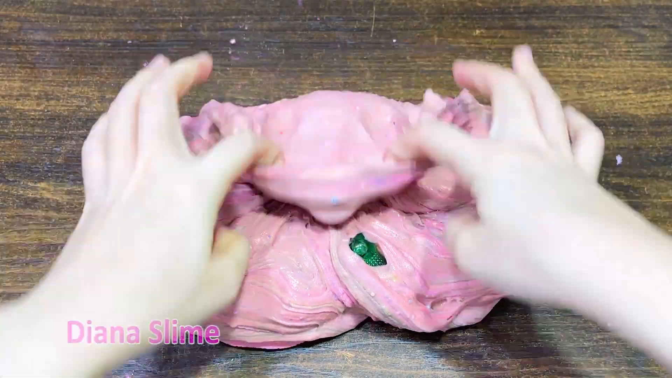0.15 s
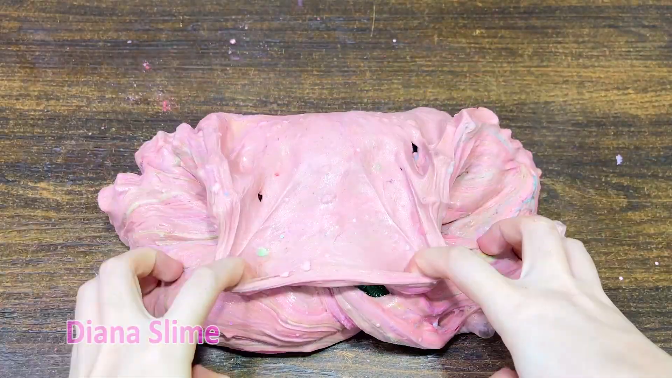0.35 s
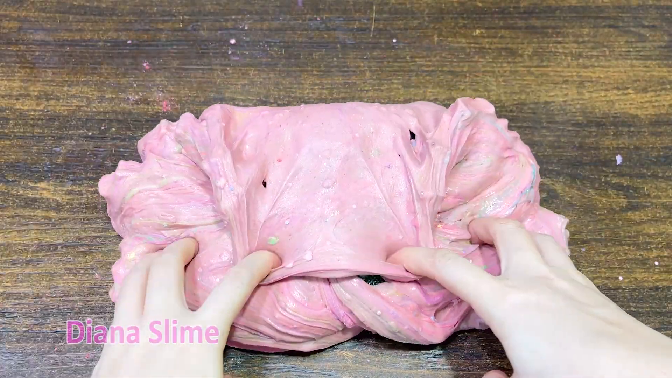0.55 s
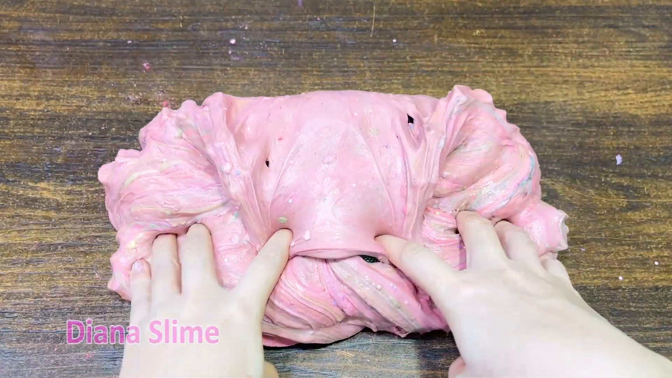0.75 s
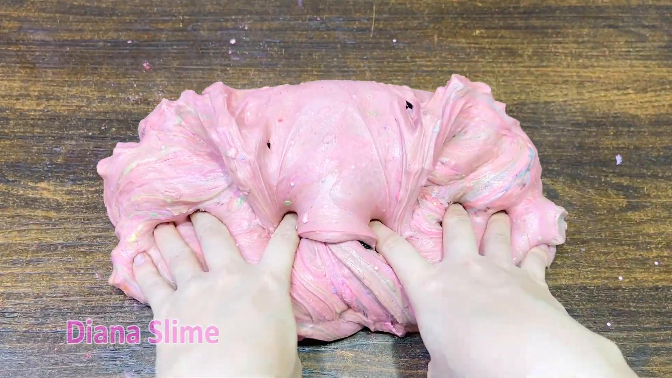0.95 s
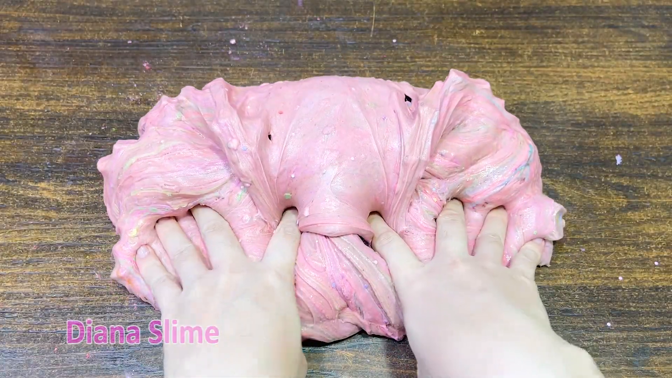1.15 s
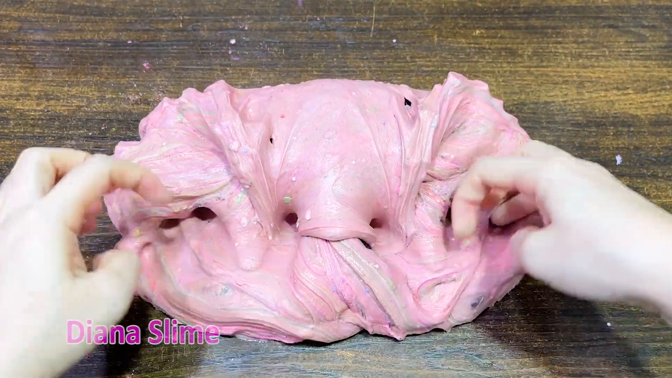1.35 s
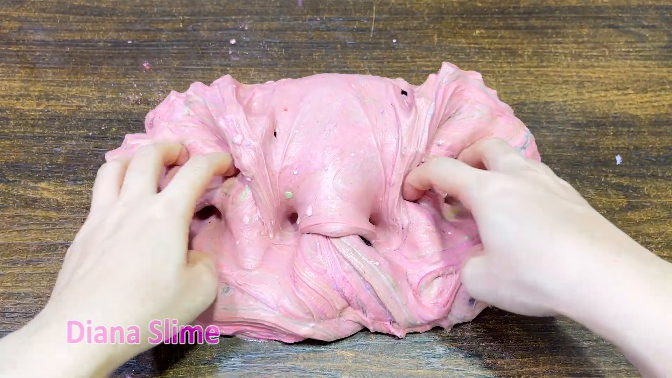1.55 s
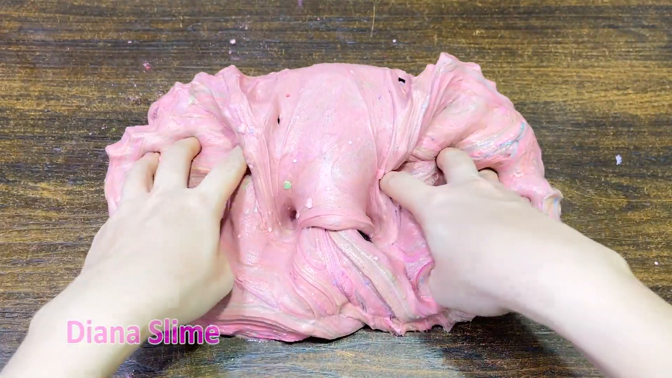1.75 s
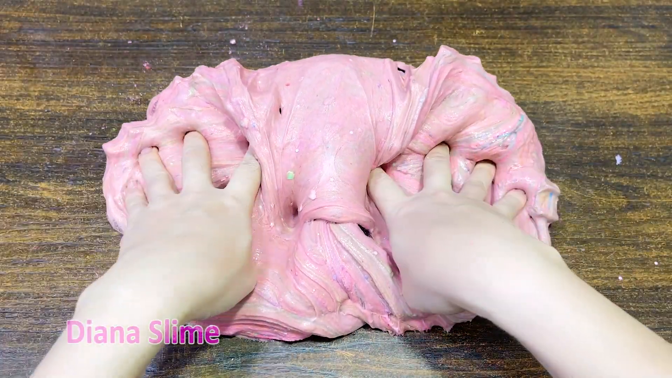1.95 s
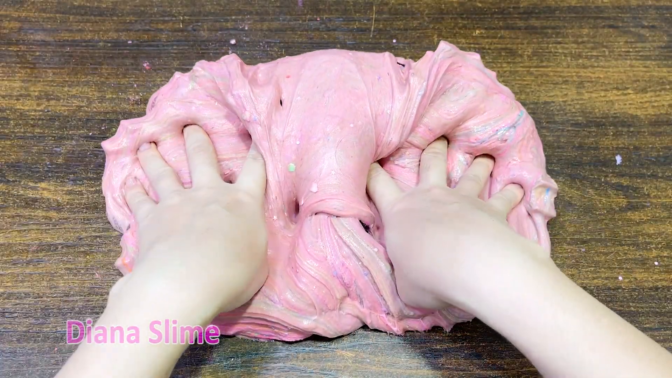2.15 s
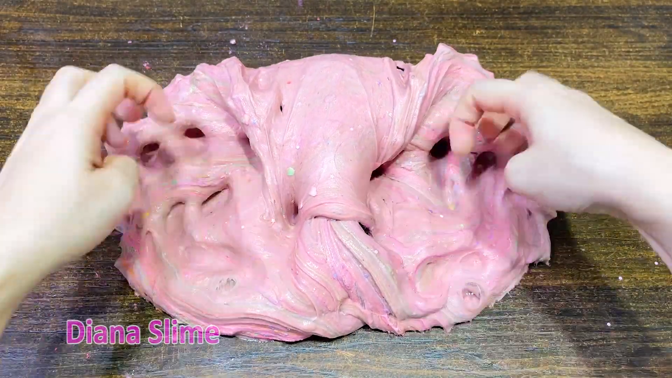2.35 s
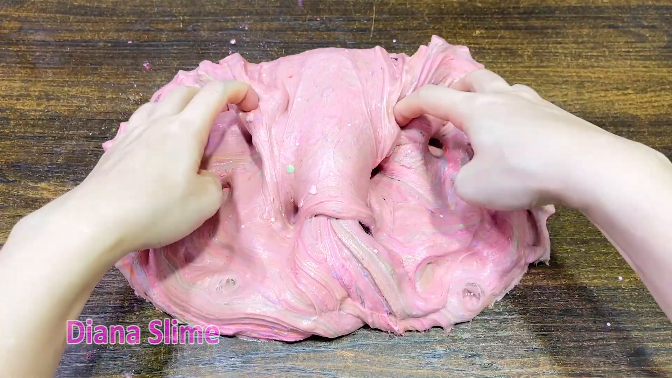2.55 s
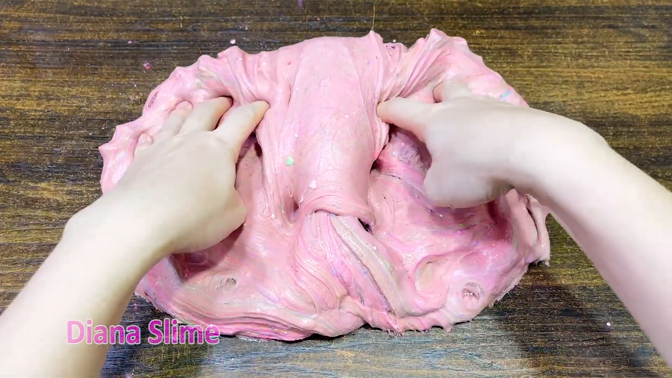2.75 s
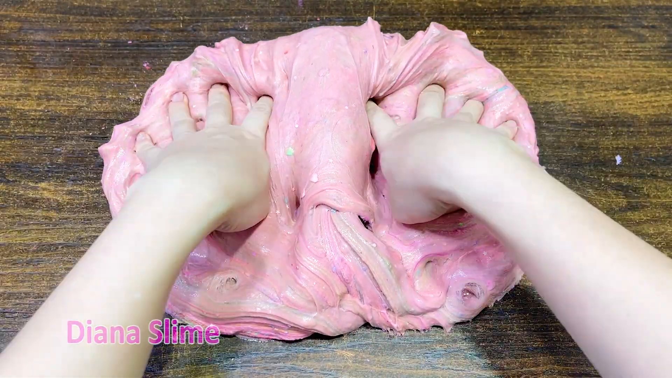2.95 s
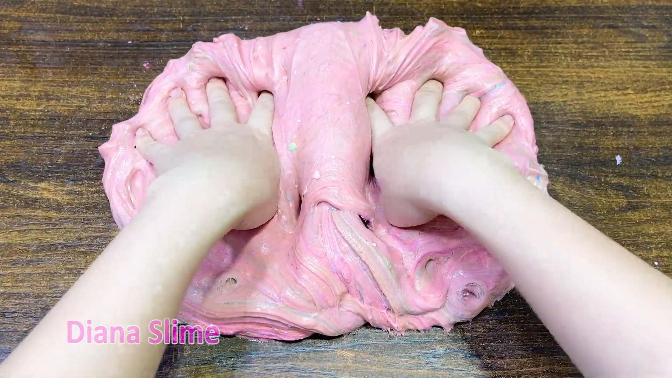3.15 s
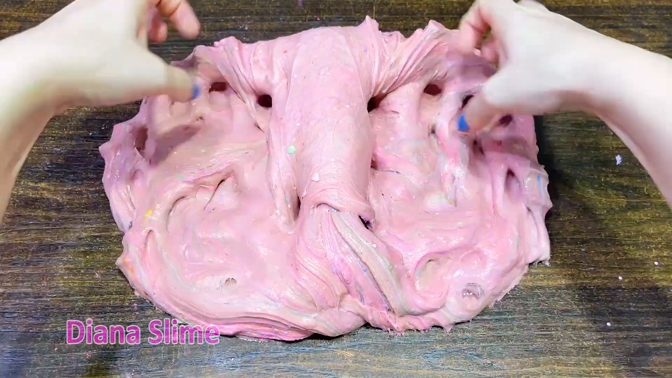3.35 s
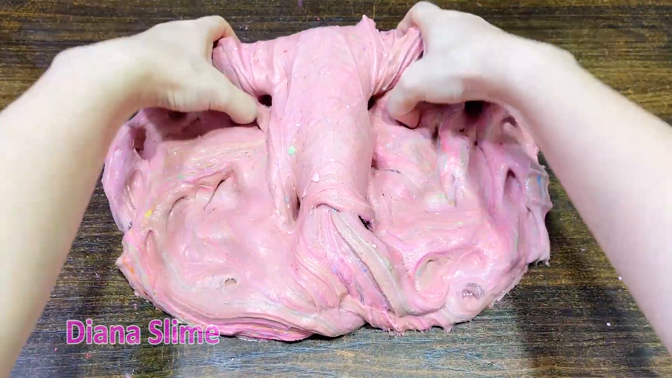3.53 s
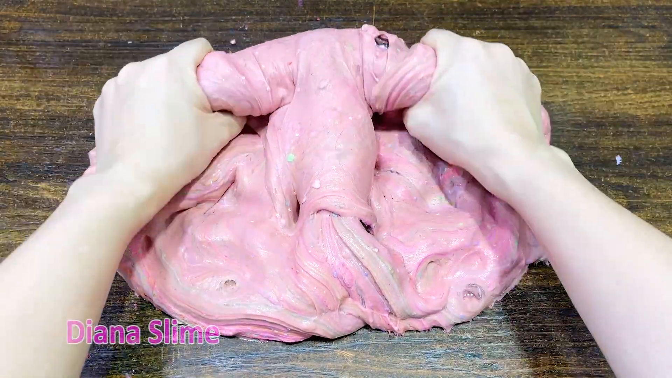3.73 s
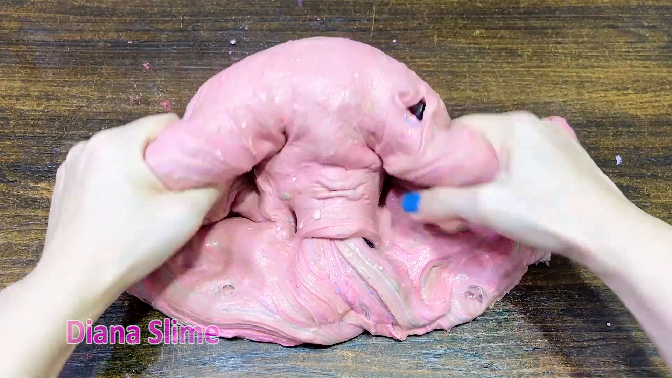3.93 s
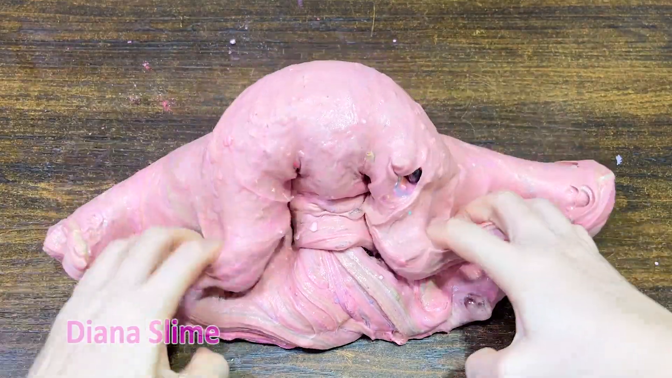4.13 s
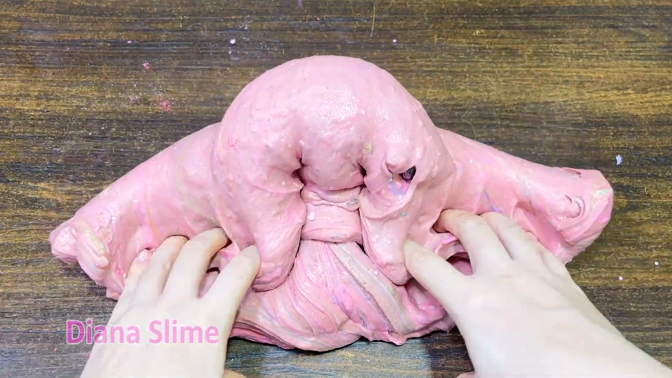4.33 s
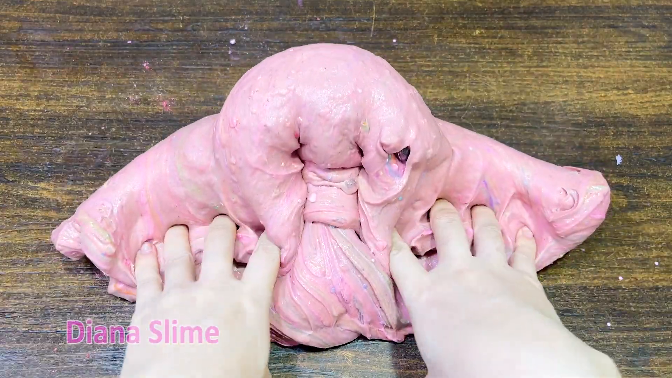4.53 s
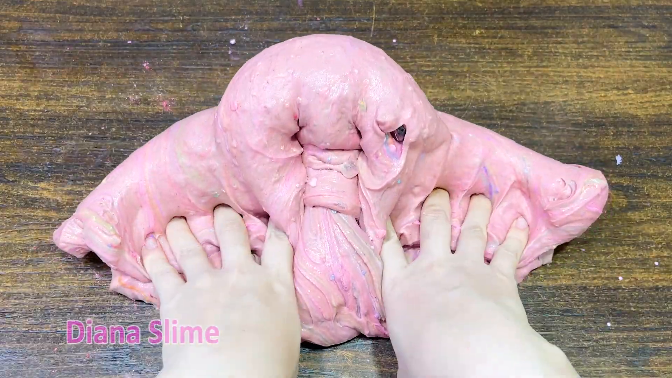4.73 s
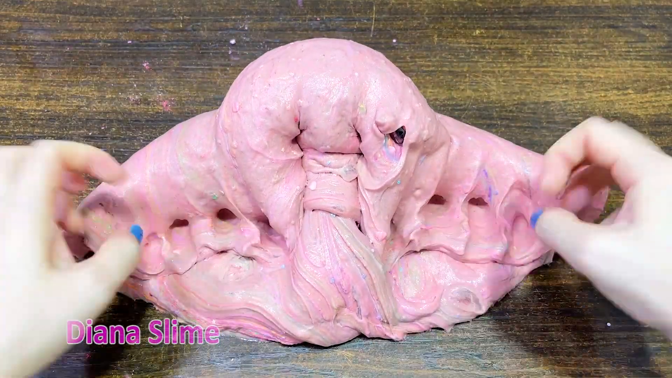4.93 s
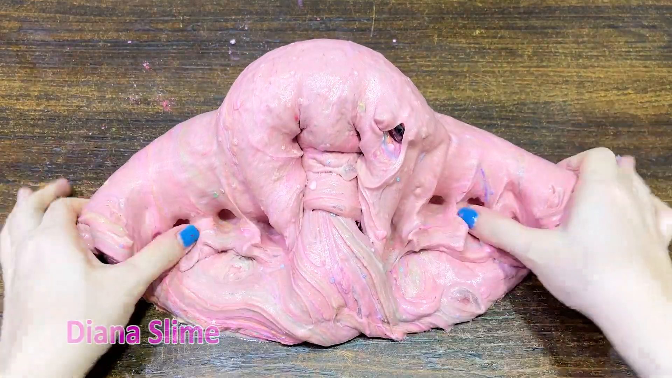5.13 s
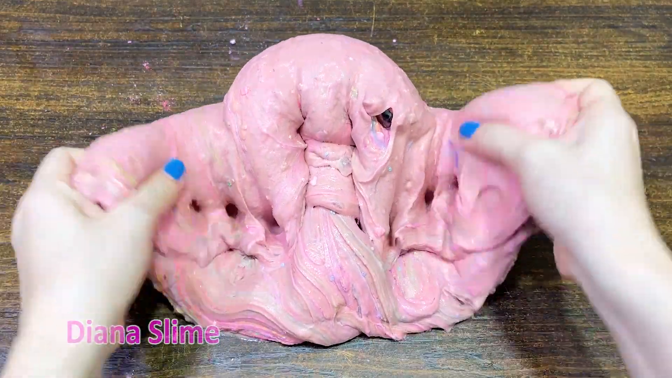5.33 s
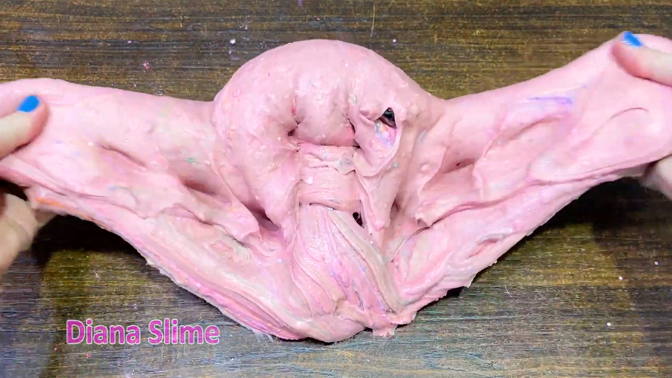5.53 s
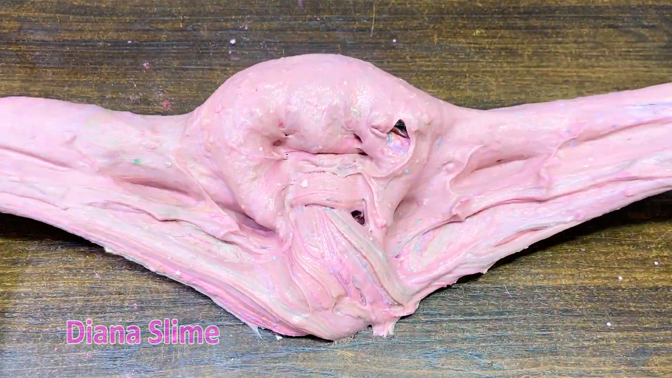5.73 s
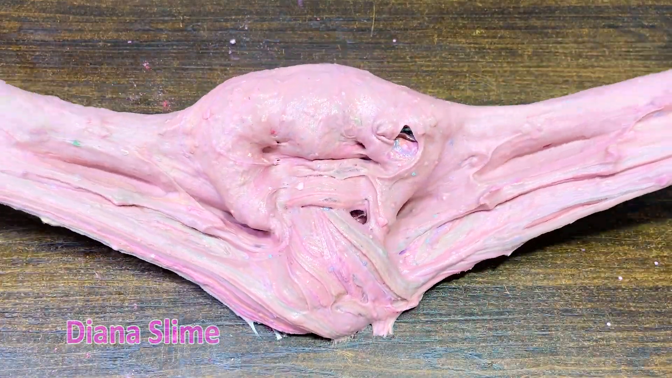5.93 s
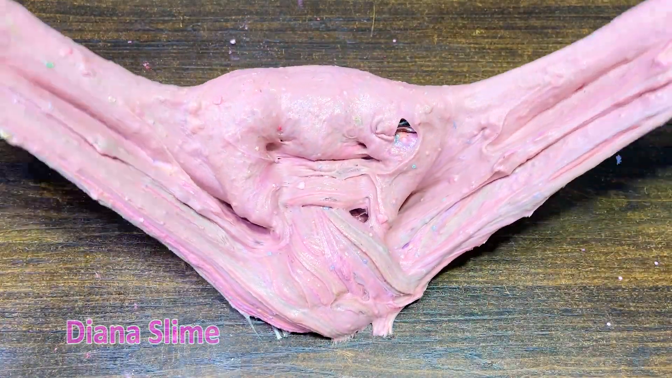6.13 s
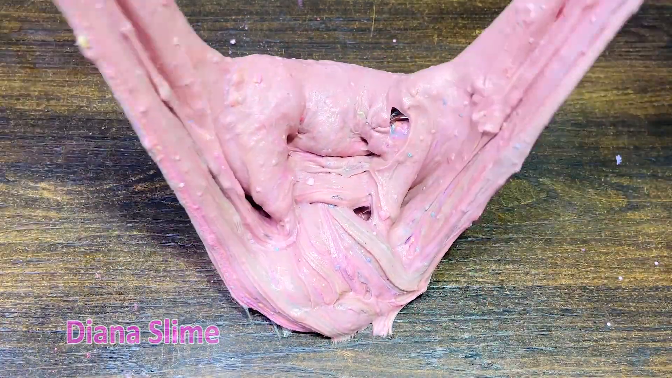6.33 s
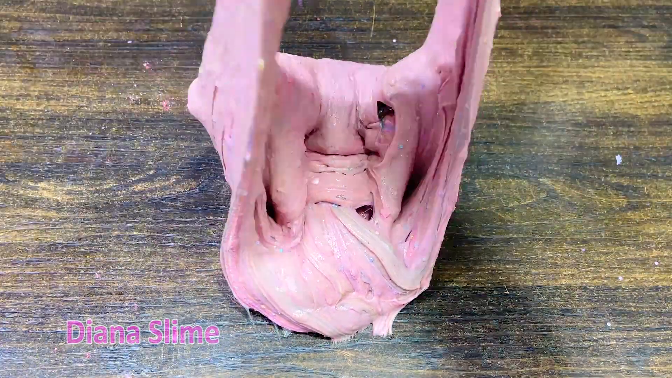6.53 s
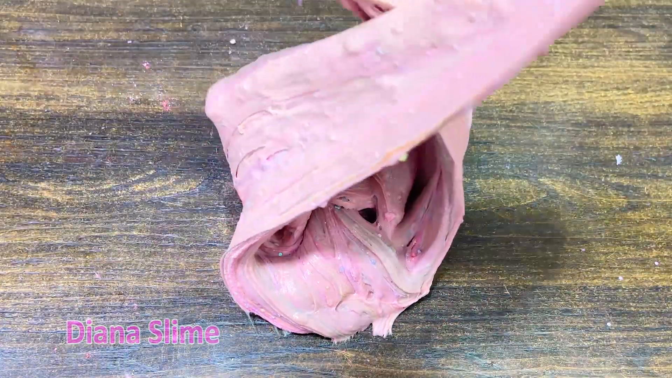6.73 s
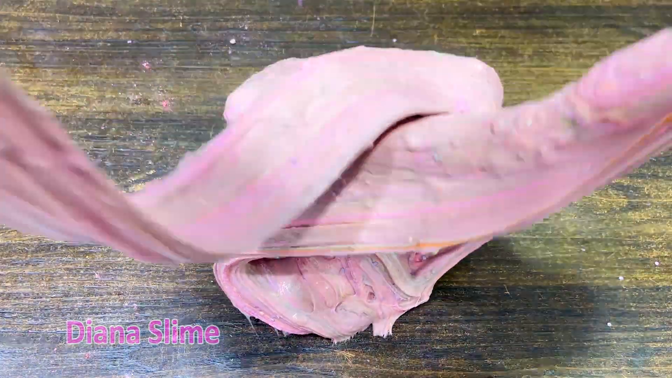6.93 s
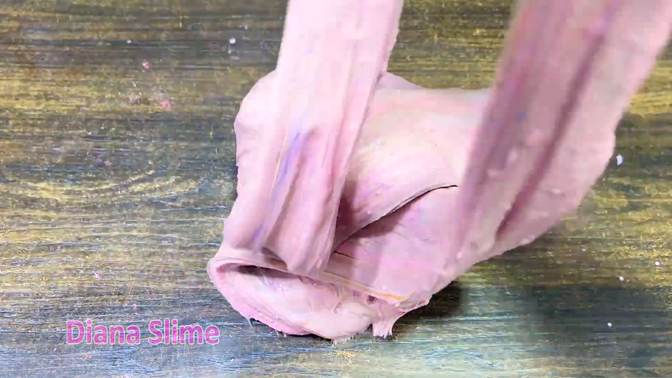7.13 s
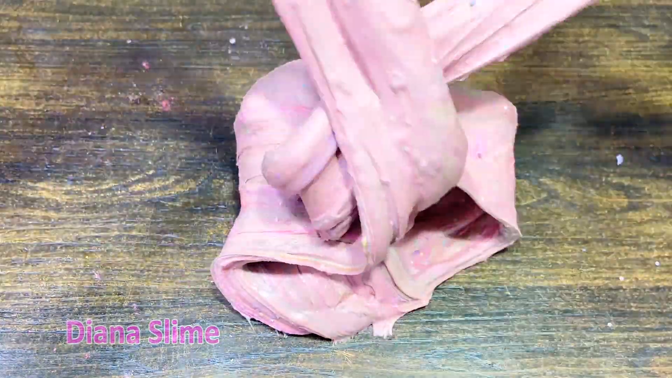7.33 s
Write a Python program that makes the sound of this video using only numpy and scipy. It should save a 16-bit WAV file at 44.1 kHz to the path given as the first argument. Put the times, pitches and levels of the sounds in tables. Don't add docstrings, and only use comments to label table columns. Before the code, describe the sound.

Very close stereo sound of hands working a soft, airy, sticky mass on a wooden table. A crackling spread comes first, then scattered pops and three short, increasingly strong wet tearing bursts with hollow plops. Folding crackles softly, another pull snaps hard, stretching pops and fizzes, then it quiets. The small room is still, with a faint distant machine drone.

```python
import sys
import numpy as np
from scipy import signal
from scipy.fft import rfft, irfft
from scipy.io import wavfile

SR = 44100
rng = np.random.default_rng(int(sys.argv[2]) if len(sys.argv) > 2 else 0)


def field_ratio(decibels):
    return 10 ** (np.asarray(decibels, dtype=float) / 20)


def int16_out(signal):
    q = np.round(np.clip(np.atleast_2d(signal).T, -1, 1) * 32767)
    wavfile.write(sys.argv[1], SR, q.astype(np.int16))


N = 329868
FIZZ_TOP_HZ = 15800


def rms_one(x):
    return x / np.sqrt(np.mean(x ** 2) + 1e-20)


def peak_one(x):
    return x / np.abs(x).max()


def in_time(rows):
    s, *columns = np.transpose(rows)
    return [np.interp(np.arange(N) / SR, s, c) for c in columns]


def at_hz(points, hz):
    points = np.array(points)
    return np.interp(np.log(hz + 1e-9), np.log(points[:, 0]), points[:, 1])


def drift(rate):
    r = np.exp(-80 * np.pi * rate / SR)
    noise = rng.standard_normal(N // 40 + 2002)
    slow = signal.lfilter([1], [1, -2 * r, r * r], noise)[2000:]
    return np.interp(np.arange(N) / 40, np.arange(len(slow)), rms_one(slow))


def resonance(x, hz, width_hz):
    r = np.exp(-np.pi * width_hz / SR)
    zeros = np.array([1, 0, -1]) * (1 - r * r) / 2
    return signal.lfilter(zeros, [1, -2 * r * np.cos(2 * np.pi * hz / SR), r * r], x)


def add(out, s, sound):
    i = max(round(s * SR), 0)
    out[i:i + len(sound)] += sound[:N - i]


def coherent(mid, side, alike):
    return np.sqrt(1 + alike) * mid + np.sqrt(1 - alike) * side * [[1], [-1]]


def stroke(start, end, peak_db, build_db, rise, fall):
    t = np.arange(N) / SR
    held = peak_db - build_db * np.clip((end - t) / (end - start + 1e-6), 0, 1)
    before, after = np.maximum(start - t, 0), np.maximum(t - end, 0)
    return field_ratio(2 * (held - rise * before - fall * after))


# seal breaks t/s, fingers free t/s, crackle level/dB,
# fizz level/dB, squelch level/dB
PULLS = [
    (1.356, 1.456, -29, -24, -37.5),
    (2.371, 2.432, -25.5, -22, -34),
    (3.349, 3.4, -22.5, -21, -28.5),
    (4.957, 5.02, -23.5, -24.5, -34),
]
# start t/s, end t/s, crackle level/dB, fizz level/dB
PRESSES = [(0, 0.063, -60, -49.5), (0.312, 0.378, -55.5, -49), (0.593, 0.776, -76, -63),
           (1.072, 1.099, -66, -61), (1.594, 1.793, -67, -73.5), (1.94, 2.15, -68, -68),
           (2.637, 3.058, -71, -65), (4.3, 4.412, -62, -58.5), (4.6, 4.753, -75, -69.5),
           (7.386, 7.461, -70, -73.5)]
# t/s, effort as crackle level/dB, thinness as extra fizz level/dB, pocket f/Hz
SPREAD = [(.06, -54, 7, 3176), (.115, -32.5, -1, 3260), (.14, -30.5, 4, 1516), (.21, -40.5, 7, 1500),
          (.27, -62.5, 8.5, 3000)]
FOLD = [(3.601, -90.5, 19.5, 2400), (3.635, -55, -11.5, 2265), (3.66, -45.5, -7, 2060),
        (3.8, -50, 2.5, 1788), (3.85, -45, 5.5, 1733), (4.03, -45.5, 4.5, 1680), (4.1, -43.5, 11, 1614),
        (4.159, -44, 4, 1690), (4.251, -57.5, 8.5, 1690)]
GRAB = [(5.172, -72.5, -6.5, 1995), (5.26, -54.5, 0.5, 1924), (5.312, -45, 4.5, 1965),
        (5.421, -43, 2.5, 2189), (5.503, -39, 7, 2475), (5.55, -44.5, 9, 2563), (5.621, -57.5, 4.5, 2920)]
STRETCH = [(5.631, -58, 3, 3330), (5.85, -56, 6, 3530), (6.15, -60.5, 4.5, 4005), (6.35, -61.5, 11.5, 4210),
           (6.44, -67.5, 11, 3040), (6.501, -54.5, 10.5, 2184), (6.55, -61, 7, 2304),
           (6.6, -79, 13.5, 2514)]


def handling():
    break_rise = 606.5
    wet_fall, fizz_fall, squelch_fall = 479.5, 519, 499
    wet = fine = squelch = field_ratio(2 * -90.5)
    for start, free, wet_db, fine_db, squelch_db in PULLS:
        wet = wet + stroke(start, free, wet_db, 17.5, break_rise, wet_fall)
        fine = fine + stroke(start, free - .015, fine_db, 13, break_rise, fizz_fall)
        fine = fine + stroke(free, free + 0.028, fine_db - 18, 0, break_rise, 254)
        squelch = squelch + stroke(start + 0.031, free + 0.0046, squelch_db, 4.5, break_rise, squelch_fall)
    for start, end, wet_db, fine_db in PRESSES:
        shape = stroke(start, end, 0, 0, rise=130, fall=112)
        wet = wet + field_ratio(2 * wet_db) * shape
        fine = fine + field_ratio(2 * fine_db) * shape
    for gesture in SPREAD, FOLD, GRAB, STRETCH:
        effort_db, thin_db, _ = in_time(gesture)
        power = field_ratio(2 * effort_db) * stroke(gesture[0][0], gesture[-1][0], 0, 0, break_rise, break_rise)
        wet = wet + power
        fine = fine + power * field_ratio(2 * thin_db)
        squelch = squelch + power * field_ratio(2 * -15)
    return 10 * np.log10([wet, fine, squelch])


def pockets():
    sealed_hz, open_hz, rest_hz, opening_s, closing_s = 3700, 1900, 3200, .04, .06
    rows = [(s, hz) for s, _, _, hz in SPREAD + FOLD + GRAB + STRETCH]
    rows += [(N / SR, 2710.0)]
    for _, free, *_ in PULLS:
        rows += [(free - opening_s, sealed_hz), (free, open_hz), (free + closing_s, rest_hz)]
    return sorted(rows)


def grains(spectrum, per_s, spread_db, sharpness, clump_db, patchy_db, width, count, pocket_db=0):
    sizes = field_ratio(spread_db * np.minimum(rng.exponential(1, N), 5)) * rng.choice([-1, 1], N)
    struck = rng.random(N) < per_s / SR
    clumps = field_ratio(clump_db * (drift(31) + drift(4.3)))
    impulses = sizes * struck / np.sqrt(per_s) * clumps
    impulses = impulses * (1 + width * rng.standard_normal(N) * [[1], [-1]])
    dealt = rng.integers(0, count, N)
    pocket, out = np.log(in_time(pockets())[0]), 0
    for k, hz in enumerate(np.geomspace(spectrum[0][0], spectrum[-1][0], count)):
        favoured_db = pocket_db * np.clip(1 - ((np.log(hz) - pocket) / .32) ** 2, 0, 1)
        gain = field_ratio(at_hz(spectrum, hz) + patchy_db * drift(13) + favoured_db)
        out = out + gain * resonance(impulses * (dealt == k) + 1e-18, hz, hz / sharpness)
    return rms_one(out)


# f/Hz, level/dB per grain; low squelch, wet crackle, fine fizz
SQUELCH = [(420, 8), (600, -6), (850, 10), (1050, -13.5)]
WET = [(1400, -2), (1600, 1), (2200, -5), (3500, -0.5), (5500, -5)]
FINE = [(5500, -6), (7000, -3.5), (9000, -14), (11000, -7.5), (14000, 6.5), (15600, 2.5)]


def tearing(wet_db, fine_db, squelch_db):
    busy = np.clip(field_ratio(wet_db + 58), .12, 1)
    squelch = grains(SQUELCH, per_s=900, spread_db=2.5, sharpness=4.5, clump_db=2.0, patchy_db=2.1,
                     width=.1, count=6)
    wet = grains(WET, per_s=2600 * busy, spread_db=2.6, sharpness=7.77, clump_db=1.4, patchy_db=1.9,
                 width=.3, count=14, pocket_db=4)
    fine = grains(FINE, per_s=9000 * busy, spread_db=-1.5, sharpness=4.8, clump_db=1.85, patchy_db=1.0,
                  width=0.51, count=12)
    top = signal.cheby2(10, 40, FIZZ_TOP_HZ + 200, fs=SR, output="sos")
    fine = signal.sosfilt(top, fine)
    return field_ratio(squelch_db) * squelch + field_ratio(wet_db + 0.48) * wet + field_ratio(fine_db + 3.0) * fine


# t/s, cavity peak level/dB, cavity f/Hz, snap peak level/dB Under pressing
PRESS_POPS = [(0.0218, -42, 6180, -31), (0.316, -31, 3200, -25.5), (0.3558, -33.5, 5070, -52),
              (0.3675, -36, 3900, -40), (0.4136, -29, 4530, -19.5), (0.457, -39, 2250, -41.5),
              (0.4845, -20.5, 3950, -20), (0.561, -46, 1570, -61), (0.5756, -43, 4694, -39),
              (0.6125, -35.5, 2170, -40), (0.6249, -35, 2080, -55.9), (0.6569, -44, 2040, -62),
              (0.7502, -33, 4200, -49), (1.0194, -38, 3870, -33.5), (1.0523, -39, 4300, -59),
              (1.0815, -33, 3980, -66), (1.1665, -47, 4070, -51), (1.5716, -42.5, 1970, -57),
              (1.633, -47, 1740, -83), (1.6685, -43, 1830, -68), (1.6835, -44, 1980, -40),
              (1.7313, -45, 5200, -37.5), (1.824, -19.5, 7000, -19.5), (1.9318, -39, 4400, -21),
              (2.016, -38, 1910, -35), (2.0251, -39, 2300, -30), (2.06, -46, 2239, -37),
              (2.1135, -40.5, 2200, -35), (2.1953, -26, 2000, -25.5),
              (2.583, -42, 6060, -49), (2.604, -45, 6761, -31.5), (2.6424, -49, 1900, -42),
             (2.665, -56, 7300, -26), (2.741, -46, 2060, -37), (2.9112, -38, 7300, -20),
             (3.024, -39, 7420, -40), (3.0305, -36.5, 7030, -36), (3.0619, -34.5, 7200, -29.5),
             (3.141, -47.5, 4130, -61), (4.2672, -16.5, 6900, -18.5), (4.3485, -45, 4560, -47),
             (4.3681, -41, 4580, -44), (4.3843, -36, 7530, -34), (4.416, -35, 4960, -37.5),
             (4.531, -60, 7340, -42.5), (4.6156, -47, 5500, -51), (4.6595, -36, 6530, -31.5),
             (4.672, -40, 7200, -62), (4.6984, -43, 7300, -46), (4.7207, -43.5, 5380, -40),
             (4.7725, -47, 6804, -41), (4.783, -45.5, 6700, -32)]
PULL_POPS = [(0.097, -18, 6000, -13.5), (0.1046, -21, 3240, -20.5), (0.1875, -20.5, 7000, -26),
             (0.2168, -22, 6955, -27.5), (1.36, -61, 7321, -25.5), (1.3652, -30, 6567, -18.5),
             (1.3918, -18, 3900, -22.5), (1.408, -17.5, 4600, -18.5), (1.4402, -13, 4000, -3),
             (1.4528, -21.5, 1600, -39), (1.4919, -28.5, 3190, -29), (2.3879, -13, 5400, -7),
             (2.423, -22, 4170, -19), (2.436, -30, 1970, -25), (2.487, -37, 6700, -35),
             (3.372, -20, 4200, -15.5), (3.376, -22, 2132, -14.5), (3.4011, -8.5, 2780, -13),
             (5.0052, -24.5, 6600, -13.5), (5.01, -9, 6240, -7.5), (5.0135, -10, 3350, -5.5)]
SHEET_POPS = [(3.575, -41.5, 5050, -39.5), (3.6429, -38, 2450, -27.5), (3.7483, -34, 1730, -47),
              (3.7858, -29, 5270, -32.5), (3.828, -32, 1940, -16), (3.8367, -28, 7200, -19.5),
              (4.0017, -37, 4457, -34), (4.205, -42, 3570, -31), (4.215, -24, 4450, -32.5),
              (5.199, -35, 2230, -33.5), (5.24, -32, 5400, -43), (5.247, -33.5, 2570, -57),
              (5.254, -32.5, 1960, -18.5), (5.434, -33, 1894, -18), (5.4495, -40, 1937, -21),
              (5.4958, -26, 7385, -16), (5.5051, -6, 6900, -8.5), (5.591, -51, 2713, -24.5),
              (5.6719, -38.5, 5740, -25), (5.7104, -32, 5160, -41), (5.835, -16.5, 8150, -17),
              (5.855, -29, 7360, -43), (5.955, -34.5, 5400, -55), (5.9936, -41, 5469, -29.5),
              (6.2666, -56, 5060, -35.5), (7.125, -48, 4134, -40)]
TICKS = [(0.2976, -47, 2140, -40), (0.347, -46, 1450, -55), (0.362, -34, 3300, -55),
         (0.569, -48, 7500, -46), (0.61, -42, 4300, -52), (0.787, -55, 2180, -61), (0.849, -59, 1700, -70),
         (0.866, -55, 4500, -62), (0.883, -49, 5430, -67), (0.9676, -47.5, 5000, -65),
         (1.138, -46.5, 3800, -54), (2.308, -57, 4260, -67), (2.6256, -50, 1600, -65),
         (2.678, -45, 5500, -50), (2.707, -55, 1450, -58), (2.735, -48, 2500, -63), (2.745, -47, 2100, -58),
         (2.759, -40.5, 3890, -61), (2.821, -53.5, 1570, -58), (2.839, -52, 1680, -60),
         (2.847, -52, 3690, -61), (2.8645, -50, 3500, -40), (2.942, -41, 7660, -39),
         (2.974, -61, 1800, -56), (3.625, -50, 2160, -57), (3.6542, -31, 5600, -41),
         (3.6802, -46, 2200, -51.5), (3.6996, -38, 2140, -50), (3.926, -31, 3500, -46.5),
         (4.0625, -31.5, 7720, -26), (5.282, -30, 6200, -45), (5.301, -41, 2780, -42),
         (5.3138, -35, 1850, -33.5), (5.34, -29, 1750, -33.5), (5.6593, -49, 3740, -50),
         (5.7934, -45, 2720, -48), (5.8157, -45, 1590, -46), (5.846, -40, 3280, -54),
         (5.9256, -53, 3580, -50), (6.0254, -42.5, 4060, -50), (6.127, -49, 3950, -34),
         (6.2204, -45, 2900, -52), (6.247, -37, 7400, -47), (6.285, -47, 6910, -49),
         (6.972, -56, 6490, -46), (7.415, -52, 2840, -58), (7.439, -56, 2700, -51),
         (7.3695, -62, 2790, -62), (7.391, -62, 2290, -65.5), (7.456, -53, 2180, -59)]


def pops():
    out, t = np.zeros(N), np.arange(1200) / SR
    rows = PRESS_POPS + PULL_POPS + SHEET_POPS + TICKS
    bright = signal.butter(4, [8800, 16100], "band", fs=SR, output="sos")
    opening = 1 - np.exp(-t / 0.00007)
    for (s, cavity_db, hz, snap_db), noise in zip(rows, rng.standard_normal((len(rows), 2, len(t)))):
        t60 = .0028 + .15 * field_ratio(snap_db) ** 4
        dying = opening * field_ratio(-60 * t / t60)
        swell = (1 - np.exp(-3 * t * hz)) ** 2
        decay = field_ratio(-60 * t * hz / 7)
        ringing = .75 * peak_one(swell * decay * np.sin(2 * np.pi * hz * t))
        around = signal.butter(2, [hz / 1.8, hz * 1.7], "band", fs=SR, output="sos")
        spray = field_ratio(-11) * peak_one(dying * signal.sosfilt(around, noise[0]))
        snap = peak_one(dying * signal.sosfilt(bright, noise[1]))
        add(out, s, field_ratio(cavity_db + 5.5) * (ringing + spray) + field_ratio(snap_db + 1.5) * snap)
    return out


# t/s, peak level/dB, f/Hz
CLICKS = [(.4137, -28, 7800), (.7503, -28, 5600), (1.067, -44, 4200), (2.0254, -32.5, 6600),
          (2.0597, -42, 5800), (2.1137, -39, 3900), (2.1954, -13, 2550), (1.9322, -17, 11600),
          (2.6424, -42, 5200), (3.654, -41, 2700), (3.8277, -21.5, 7800), (4.0018, -34, 6400),
          (4.343, -43, 6200), (4.527, -56, 4100), (4.558, -61, 3100), (4.592, -50, 1800),
          (5.2545, -30, 7200), (5.4495, -32, 3900), (2.9105, -47, 2600), (7.402, -54, 2650),
          (1.3495, -36.5, 6200), (2.355, -38, 3700), (5.3685, -38, 4300)]


def clicks():
    out, t = np.zeros(N), np.arange(300) / SR
    for s, peak_db, hz in CLICKS:
        shape = t * hz * field_ratio(-60 * t * hz / 3.9)
        add(out, s, field_ratio(peak_db) * peak_one(shape * np.sin(2 * np.pi * hz * t)))
    return out


# t/s, peak level/dB, hole f/Hz, decay t60/s
PLOPS = [(0.101, -44, 288, 0.037), (0.15, -43.5, 260, 0.062), (1.378, -36.5, 397, 0.04),
         (1.388, -23.5, 316, 0.035), (1.412, -22.5, 407, 0.055), (1.42, -20.5, 335, 0.025),
         (1.434, -32.5, 331, 0.03), (1.464, -23, 301, 0.038), (1.496, -44, 287.6, 0.17),
         (2.394, -26.5, 300, 0.032), (2.419, -25.5, 288, 0.061), (2.434, -28, 473, 0.039),
         (3.381, -22, 292, 0.06), (3.403, -29.5, 478, 0.018), (3.42, -30, 509, 0.046),
         (5.045, -26.5, 475, 0.04), (3.642, -44.5, 298, 0.019), (4.983, -22, 316, 0.035),
         (4.998, -29.5, 330, 0.034), (5.008, -27.5, 345, 0.035), (5.019, -16.5, 340, 0.025),
         (5.032, -25.5, 267.3, 0.14)]


def plops():
    out, t = np.zeros(N), np.arange(6000) / SR
    for s, peak_db, hz, t60 in PLOPS:
        shape = (1 - np.exp(-t / 0.0027)) ** 2 * field_ratio(-60 * t / np.clip(t60, .01, .15))
        add(out, s - .004, field_ratio(peak_db) * shape / shape.max() * np.sin(2 * np.pi * hz * t))
    return out


# start t/s,
# length t/s, rms level/dB, pocket f/Hz
GURGLES = [(0.067, 0.035, -53.5, 1670), (0.097, .01, -34.5, 3220), (.123, 0.0089, -35, 2950),
           (.124, 0.011, -52, 1600), (0.134, 0.015, -36, 1530), (0.143, 0.017, -35.5, 3200),
           (.17, .005, -41.5, 4500), (0.199, .007, -47, 1990), (0.212, 0.0083, -45, 3000),
           (1.4, 0.0057, -31.5, 3700), (1.411, 0.0065, -34, 1965), (1.44, 0.0042, -19.5, 3890),
           (1.454, 0.003, -27, 1730), (1.455, 0.0036, -32, 3730), (1.461, 0.0072, -33, 1930),
           (1.463, .007, -36, 3940), (2.399, 0.01, -32, 6550), (2.41, 0.0256, -41.5, 1900),
           (2.433, 0.0086, -29, 1780), (2.447, 0.016, -43, 2280), (3.325, 0.014, -46, 3880),
           (3.364, 0.016, -29.5, 4220), (3.39, .006, -24.5, 3850), (3.398, 0.0043, -30, 1914),
           (3.407, 0.013, -34.5, 900), (3.408, 0.01, -24.5, 3340), (3.419, 0.004, -31, 2970),
           (3.445, 0.046, -57, 3250), (4.957, 0.011, -34, 6800), (4.964, 0.0036, -39.5, 2040),
           (5.003, 0.019, -24.5, 6680), (5.009, 0.0055, -23.5, 2770), (5.018, .006, -27.5, 3360),
           (5.027, 0.017, -32, 1970), (5.031, 0.012, -30, 3940), (6.335, 0.04, -58, 4650),
           (7.386, 0.08, -72, 2400), (7.241, 0.091, -58.5, 684), (7.362, 0.053, -55, 640),
           (.2, 0.0077, -33, 7400), (1.441, 0.0038, -22, 6100), (3.352, 0.042, -34.5, 11300),
           (2.385, 0.033, -31, 11400), (7.439, .035, -64.5, 10980)]


def gurgles():
    out, t = np.zeros((2, N)), np.arange(7000) / SR
    sharpness, rise_s, edge_s, width = 3.6, .0008, .0022, .35
    for (s, length, db, hz), noise in zip(GURGLES, rng.standard_normal((len(GURGLES), 2, len(t)))):
        width_hz = hz / sharpness
        mid, side = resonance(resonance(noise, hz, width_hz), hz, width_hz)
        side = side * min(hz / 4000, 1)
        gate = np.clip(t / rise_s, 0, 1) * np.exp(-np.maximum(t - length, 0) / edge_s)
        gate = gate * field_ratio(db) / np.sqrt(np.mean(mid[t < length + edge_s] ** 2))
        add(out[0], s, gate * (mid + width * side))
        add(out[1], s, gate * (mid - width * side))
    return out


# t/s, peak level/dB
THUMPS = [(.4847, -35), (0.7498, -48), (2.0162, -38.5), (2.0249, -40), (2.1956, -31), (5.256, -41.5)]


def thumps():
    out, t = np.zeros(N), np.arange(2000) / SR
    from_hz, to_hz, sink_s, t60 = 1525, 249, .0022, 0.031
    turns = to_hz * t + (from_hz - to_hz) * sink_s * (1 - np.exp(-t / sink_s))
    for s, peak_db in THUMPS:
        add(out, s, field_ratio(peak_db - 60 * t / t60) * np.sin(2 * np.pi * turns))
    return out


# t/s, peak level/dB, f/Hz, spread t/s
SWINGS = [
    (7.015, -47.5, 130, 0.03),
    (2.5, -49.5, 690, 0.013),
]


def swings():
    t, out = np.arange(N) / SR, 0
    for s, db, hz, spread in SWINGS:
        out = out + field_ratio(db - 7.5 * ((t - s) / spread) ** 2) * np.sin(2 * np.pi * hz * t)
    return out


def bumps(rows, rest_db, rise, fall):
    peaks = sum(stroke(s, s, db, 0, rise, fall) for s, db in rows)
    return 10 * np.log10(field_ratio(2 * rest_db) + peaks)


def humming(modes, level_db, lumpy_db, alike):
    mid, side = rng.standard_normal((2, N))
    noise, tuned = coherent(mid, side, alike), 0
    for hz, width_hz, db in modes:
        mode = resonance(resonance(noise, hz, width_hz), hz, width_hz)
        tuned = tuned + field_ratio(db) * mode / np.sqrt(width_hz)
    return field_ratio(level_db + lumpy_db * drift(4.6)) * rms_one(tuned)


# f/Hz, width f/Hz, level/dB
TABLE = [(66, 30, 0), (95, 35, -4), (150, 60, -8)]
# t/s, peak level/dB
JOLTS = [(0, -60.5), (.165, -44.5), (1.44, -49), (2.42, -43), (2.52, -48.5), (3.43, -44), (3.64, -45.5),
         (5.035, -40.5), (5.21, -53), (5.5, -54), (7.48, -57)]


def table():
    return humming(TABLE, bumps(JOLTS, -70.5, rise=292.5, fall=177.5), lumpy_db=0.0, alike=0.95)


# f/Hz, t60/s
ROOM_T60 = [(300, .35), (1300, .16), (3000, .26), (5000, .19), (12000, .16)]


def room(x):
    t, tail = np.arange(SR // 2) / SR, 0
    edges = np.geomspace(150, 16000, 11)
    for low, high in zip(edges, edges[1:]):
        band_pass = signal.butter(2, [low, high], "band", fs=SR, output="sos")
        mid, side = signal.sosfilt(band_pass, rng.standard_normal((2, len(t))))
        band = coherent(mid, side, alike=1 / (1 + low / 800))
        tail = tail + band * field_ratio(-60 * t / at_hz(ROOM_T60, np.sqrt(low * high)))
    tail = tail * np.clip((t - .002) / 0.00066, 0, 1)
    tail = tail / np.sqrt(np.sum(tail ** 2) / 2)
    return signal.fftconvolve(x[None], tail, axes=1)[:, :N]


# f/Hz, lead of the left port/rad
PORT_LEAD = [(0, -.3), (620, -.33), (800, .7), (1050, .7), (1400, .1), (2800, .3), (3600, 1.15),
             (5500, .75), (8800, .1), (9800, 1), (11000, 0), (13350, -3.14), (15200, -6.28), (22050, -6.28)]
# f/Hz, left minus right level/dB
PORT_BALANCE = [(380, 0), (520, .6), (800, -4), (1300, -.9), (2400, 0), (4400, 2.5), (9200, 2.5),
                (11500, 0)]


def ports(x):
    hz = np.fft.rfftfreq(N, 1 / SR)
    both = rfft(x)
    both = np.where(hz > 11200, both[0], both)
    lead = np.interp(hz, *np.transpose(PORT_LEAD))
    tilt = field_ratio(at_hz(PORT_BALANCE, hz) / 2)
    return irfft(both * np.array([tilt, np.exp(-1j * lead) / tilt]), N)


# f/Hz, width f/Hz, level/dB
DRONE = [(671, 205, 8.5), (756, 65, -15)]
# t/s, peak level/dB
SWELLS = [(.1, -64), (2.217, -60), (4.11, -62), (5.28, -56), (6.75, -60), (7.27, -66), (7.33, -52.5),
          (7.4, -59)]


def drone():
    since = np.arange(N) / SR - np.array(PULLS)[:, 1:2]
    dip_db = -2.5 * np.sum((since > 0) * np.exp(-np.abs(since) / 0.075), axis=0)
    swell_db = bumps(SWELLS, -62.5, rise=104, fall=104)
    return humming(DRONE, swell_db + dip_db, lumpy_db=1 / 2, alike=0.45)


def motor():
    return humming([(152.8, 13, 0)], -72.5, lumpy_db=1.5, alike=.9)


def whine():
    hz, width_hz = 7980, 1400
    band = resonance(resonance(rng.standard_normal(N), hz, width_hz), hz, .8 * width_hz)
    return field_ratio(-65) * rms_one(band) * [[1], [0]]


# f/Hz, level/dB per Hz
AIR = [(25, -28.5), (60, -4), (200, -6), (430, -3), (900, -21), (1400, -23), (3000, -24), (7000, -27),
       (11000, -26.5), (15000, -27)]


def air():
    hz = np.fft.rfftfreq(N, 1 / SR)
    mid, side = rfft(rng.standard_normal((2, N))) * field_ratio(at_hz(AIR, hz)) * (hz < FIZZ_TOP_HZ)
    alike = 1 / (1 + hz / 1500)
    return field_ratio(-67.5) * rms_one(irfft(coherent(mid, side, alike), N))


def scene():
    mass = pops() + clicks() + gurgles() + thumps() + plops() + swings() + tearing(*handling())
    near = mass + field_ratio(-16) * room(mass.mean(axis=0)) + air()
    return ports(near) + table() + drone() + motor() + whine()


def top_cut(x):
    return signal.sosfilt(signal.butter(12, 16970, fs=SR, output="sos"), x)


def record(dry):
    rounded = 0.91 * np.tanh(dry / 1.061)
    cut = signal.sosfilt(signal.butter(3, 50, "high", fs=SR, output="sos"), rounded)
    cut = signal.sosfilt(signal.cheby2(12, 70, 17450, fs=SR, output="sos"), cut)
    return top_cut(cut)


dry = scene()
out = record(dry)
int16_out(out)
```